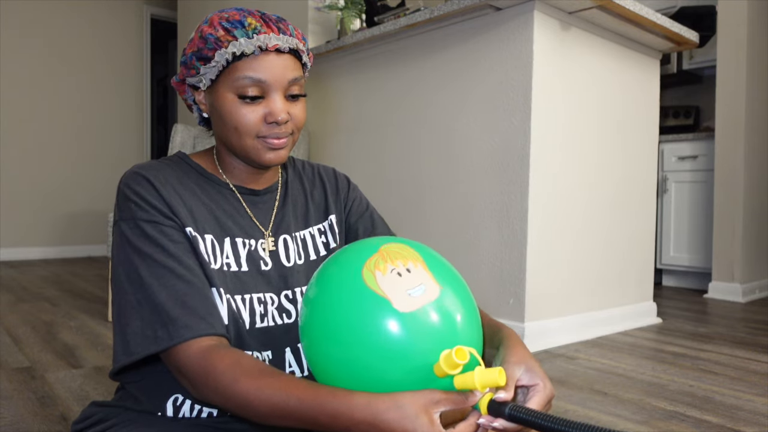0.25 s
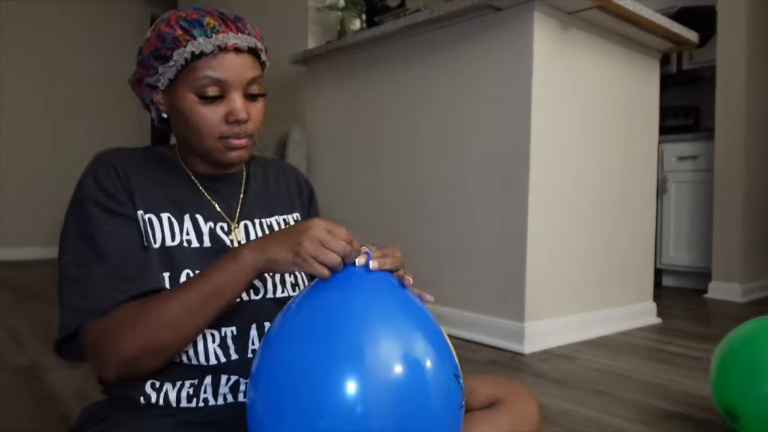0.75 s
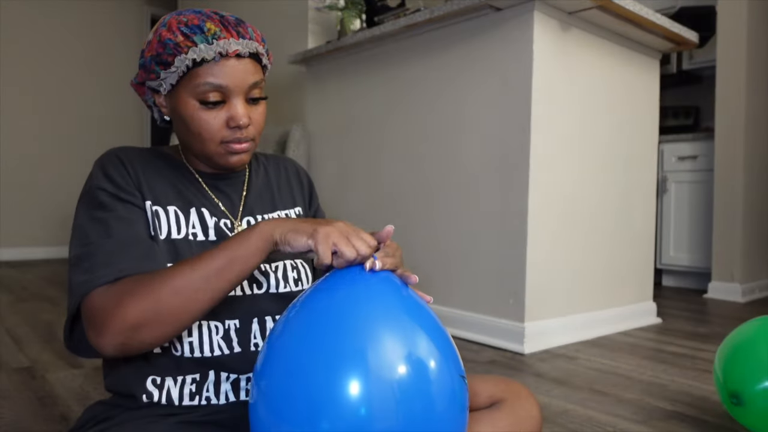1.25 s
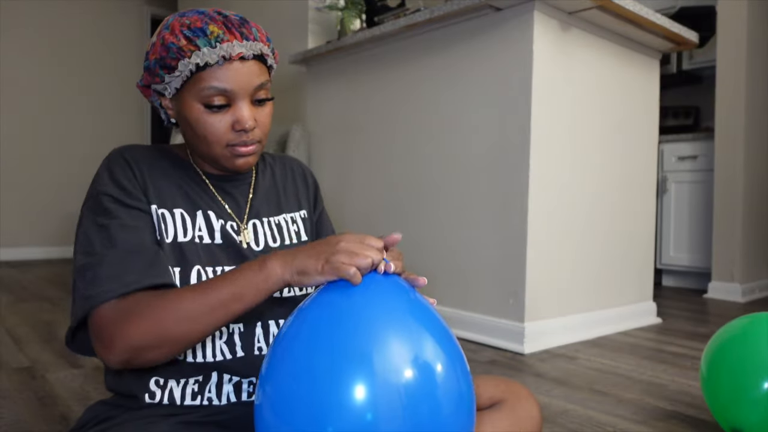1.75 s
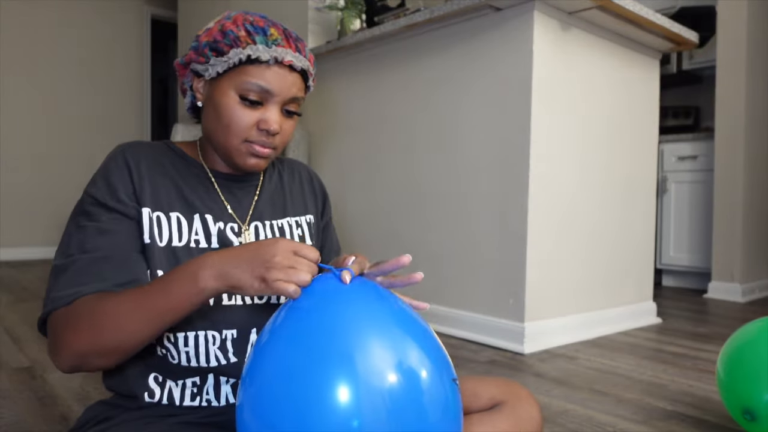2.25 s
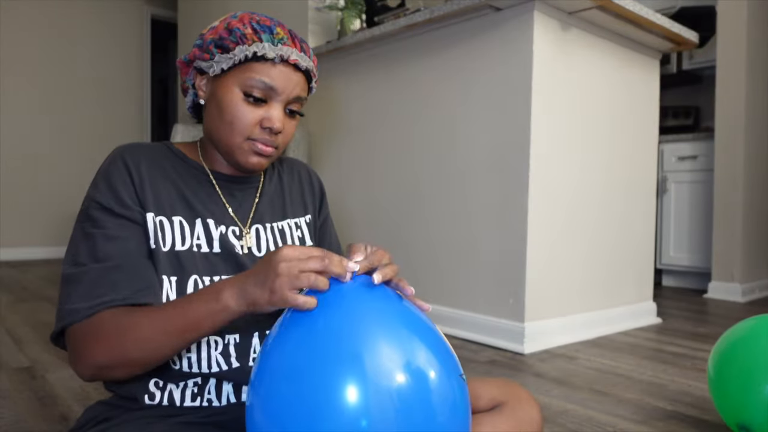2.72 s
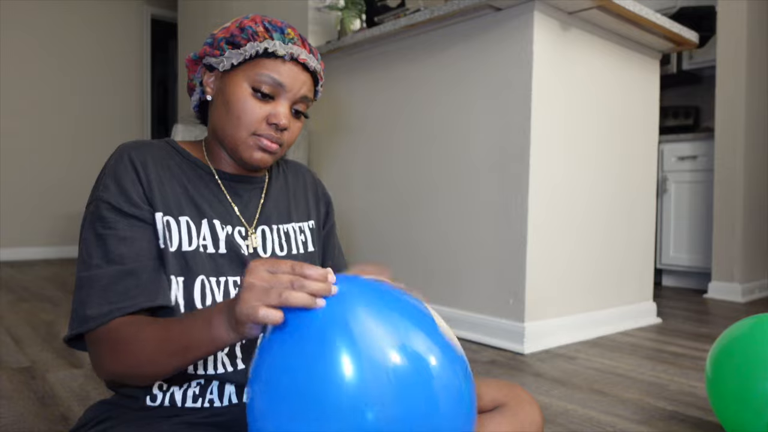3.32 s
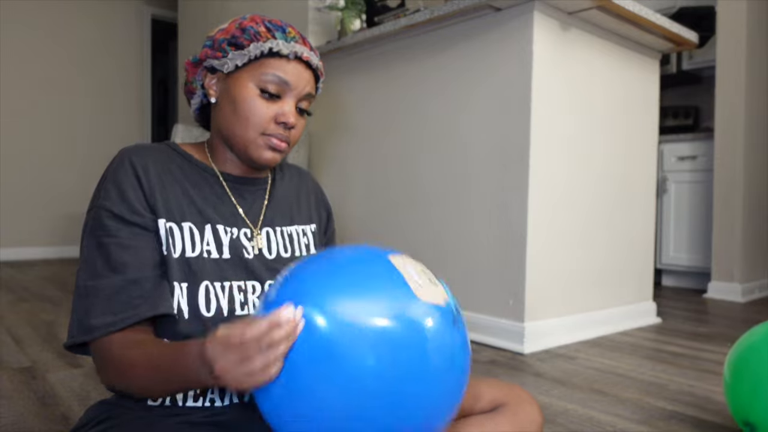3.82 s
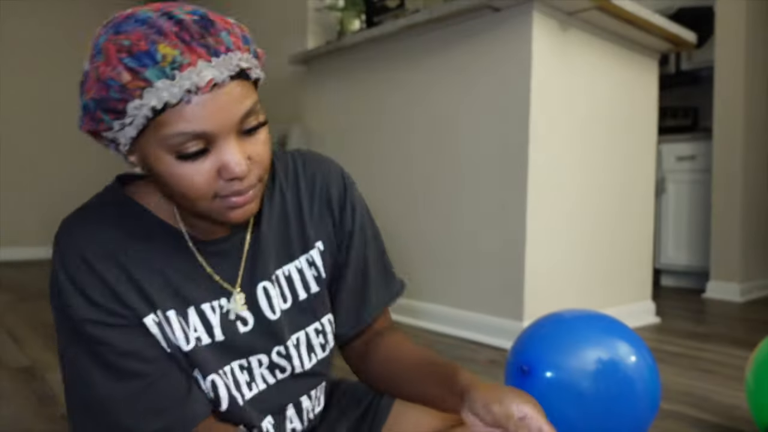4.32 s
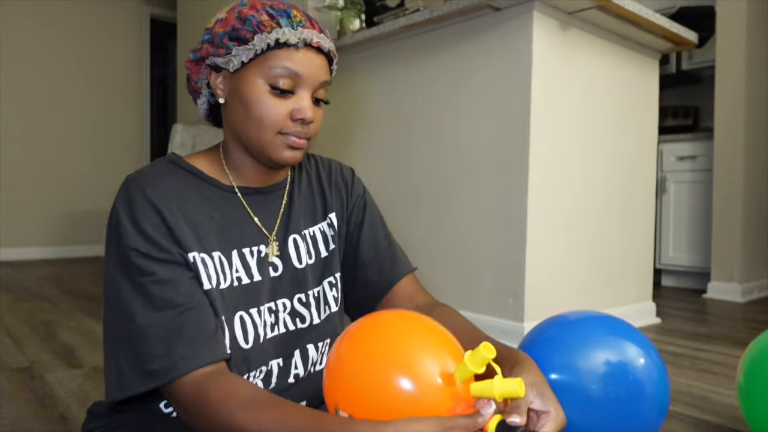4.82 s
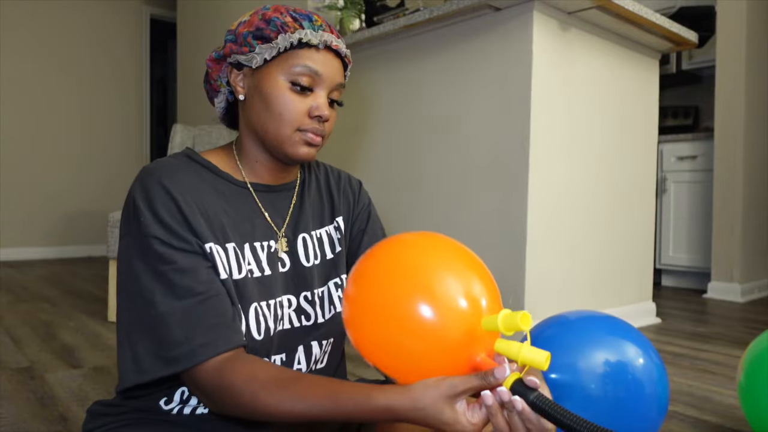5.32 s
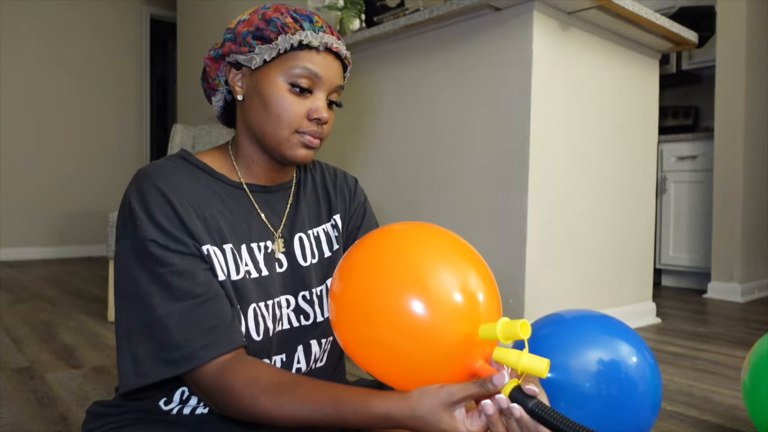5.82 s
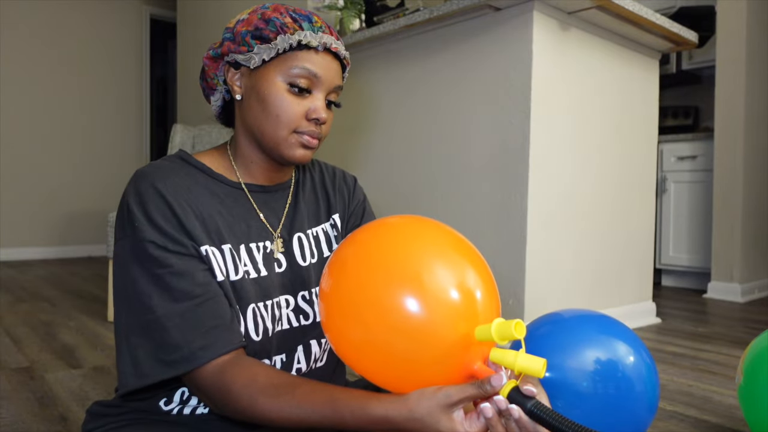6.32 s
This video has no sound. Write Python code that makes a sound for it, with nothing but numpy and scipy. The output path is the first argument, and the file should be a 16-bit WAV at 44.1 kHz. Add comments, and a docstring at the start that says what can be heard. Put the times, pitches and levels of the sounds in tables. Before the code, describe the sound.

A loud electric air pump cuts off, latex snaps and creaks softly as a balloon is knotted, then the pump blasts back higher-pitched.

```python
"""First a loud nozzle jet close by, with a blower's whine in it: an electric pump blows up a latex balloon
in a quiet living room. The jet is noise coloured by hose and nozzle; the whine is a wandering harmonic tone.
The rush stops abruptly; hands near the centre stretch and knot a balloon's neck: it ticks, creaks, snaps once,
and palms slide over the skin, all of it stick-slip noise and short bursts ringing in latex and room.
Then the pump is heard again, abruptly and at full blast, with a higher whine and a brighter jet."""
import sys
import numpy as np
from scipy import signal
from scipy.fft import rfft, irfft, next_fast_len
from scipy.io import wavfile

SR = 44100
rng = np.random.default_rng(int(sys.argv[2]) if len(sys.argv) > 2 else 0)


def file_out(sig):
    """Save sig as 16-bit WAV at sys.argv[1]."""
    # one column per channel
    cols = np.atleast_2d(sig).T
    # limit, then scale
    lim = np.clip(cols, -1, 1)
    pcm = np.round(lim * 32767).astype(np.int16)
    wavfile.write(sys.argv[1], SR, pcm)


N = 289296
TIME = np.arange(N) / SR   # seconds
BINS = np.fft.rfftfreq(N, 1 / SR)   # Hz

# The pump, heard twice. Each row: time in seconds, jet level in dB, whine level in dB.
FIRST_RUN = [(0, -14.5, -22.1), (0.43, -15, -23)]
SECOND_RUN = [(4.3, -15.5, -23.5), (4.4, -14.5, -27.5), (4.9, -15.5, -24.8), (6.56, -15, -23.5)]
FIRST_STOP_S, SECOND_START_S = 0.434, 4.292
FIRST_WHINE_HZ, SECOND_WHINE_HZ = 620.1, 1253.7
# Partials of each whine. Each row: multiple of the whine's pitch, level in dB relative to the whine level.
FIRST_PARTIALS = [(1, 1), (2, -24), (3, -22.5)]
SECOND_PARTIALS = [(1, 1), (2, -29), (3, -21), (6, -16), (7, -9), (12, -32)]
# How the second whine's overtones rise and sink as the balloon fills. Each row: time in seconds, change in dB.
OVERTONE_SWELL = [(4.3, -4), (4.65, 3.5), (5.4, 3.5), (5.9, -2), (6.56, 1)]
# Colour of the jet. Each row: frequency in Hz, relative density in dB per Hz.
FIRST_JET = [(40, -51), (100, -42), (200, -27.5), (330, -14.5), (550, -7), (1000, -4), (2200, 3),
             (4000, -1.5), (7000, -1), (8300, -4), (10000, -2), (11500, -7), (13000, -6), (15700, -12.5)]
SECOND_JET = [(40, -57), (170, -52.5), (300, -41.5), (480, -31), (750, -16), (1100, -14), (2000, -6.5),
              (4200, 1.5), (6000, -2), (8100, -5.5), (10400, -6.5), (12500, -4), (14200, -1.5), (15700, -4)]
# Resonances of hose and nozzle. Each row: frequency in Hz, width in Hz, lift in dB.
FIRST_HOSE = [(1286, 170, 4.5), (1860, 150, 7), (2695, 140, 5), (3450, 160, 4.5), (4650, 260, 4),
              (6770, 450, 3), (9150, 300, 2.5), (12300, 550, 4.5), (14400, 300, 2.5)]
SECOND_HOSE = [(2550, 53, 6.4), (3850, 270, 2.6), (5580, 120, 3.7), (6830, 290, 3.1), (8980, 760, 5.3),
               (13400, 230, 1.8)]
# Direction of the pump. Each row: frequency in Hz, left minus right in dB.
FIRST_PAN = [(700, -1.64), (2000, -3), (5500, -2.5), (8300, -3), (11000, 1.3), (13800, 4)]
SECOND_PAN = [(700, -0.85), (1300, -1.68), (2100, -2.1), (3500, -4), (5500, -3.5), (8300, -2.5),
              (10500, -4), (14000, -2)]
# Motor hum in the second run. Each row: frequency in Hz, level in dB.
MOTOR_HUM = [(128, -81), (240, -83)]

# How the room dies away. Each row: frequency in Hz, time to fall by 60 dB in seconds.
ROOM_T60 = [(300, 0.86), (3000, 0.23), (6000, 0.18), (12000, 0.62)]
# Colour of the still air. Each row: frequency in Hz, relative density in dB per Hz.
AIR_COLOUR = [(30, -36.5), (110, -26.5), (170, -7), (300, -2.5), (500, -3.5), (1000, -2), (2500, 2),
              (6000, -4), (10000, -10.5), (15700, -16)]
AIR_DB, ROOM_HUM_HZ, ROOM_HUM_DB = -79, 242, -95

# Grip of the latex, from tying the neck to sliding palms.
# Each row: time in seconds, share of the friction that comes as separate slips (0-1).
GRIP = [(0.5, .25), (0.7, .78), (1.05, 0.7), (1.3, 0.45), (2.1, 0.55), (2.85, 0.5), (3.1, 0.28),
        (3.7, 0.22), (4.25, 0.15)]
# Strokes of fingers and palms on latex.
# Each row: start in seconds, end in seconds, rasp level in dB, lower and upper edge of the rasp in Hz.
STROKES = [(0.527, 0.582, -66, 3200, 8700), (0.67, 0.714, -59.5, 3000, 5400),
           (0.76, 0.912, -66, 3000, 7200), (0.916, 1.013, -54.5, 3380, 7000),
           (1.032, 1.086, -51, 3480, 6600), (1.1, 1.172, -63, 2700, 6700),
           (1.245, 1.277, -61.5, 3400, 5700), (1.545, 1.65, -61, 3280, 6100),
           (1.653, 1.831, -68, 2600, 5900), (1.847, 1.968, -67.5, 5900, 6440),
           (2.279, 2.295, -59, 1100, 5500), (2.32, 2.38, -68, 4600, 7100),
           (2.492, 2.523, -65.5, 2100, 6600), (2.704, 2.739, -62.5, 2000, 7500),
           (2.853, 2.908, -65, 2500, 9200), (3.016, 3.087, -60.5, 2300, 7300),
           (3.106, 3.185, -58.5, 2500, 9300), (3.195, 3.299, -58.5, 2100, 5700),
           (3.33, 3.356, -70, 3000, 11000), (3.43, 3.496, -60.5, 2100, 7800),
           (3.528, 3.58, -58, 3900, 6500), (3.611, 3.742, -51.5, 3360, 7560),
           (3.745, 3.898, -62, 5330, 9000), (3.9, 3.974, -55.5, 6200, 9100),
           (4.125, 4.305, -64.5, 5600, 10500)]
# Between strokes the hands never quite leave the skin. Each row: time in seconds, rustle level in dB.
RESTING = [(0.46, -84), (0.7, -73), (1.2, -66.5), (1.4, -76), (1.55, -69.5), (2.2, -78.5), (2.45, -71.5),
           (2.65, -86), (2.78, -69), (3.05, -69.5), (4.1, -74.5)]
RESTING_LOW_HZ, RESTING_HIGH_HZ = 2900, 7800
RESTING_BODY_DB = -12.5   # the body relative to the rustle
USUAL_RASP_DB, USUAL_LOW_HZ, USUAL_BODY_DB = -60, 3000, -77.5   # an ordinary stroke
BODY_FOLLOWS = 0.59   # dB of body per dB of rasp
BODY_LOSS_DB_PER_OCT = 15   # the body's loss as the rasp's lower edge rises: a light, bright touch
BALLOON_ECHO_S = 0.00103   # time that sound takes to cross the balloon
# Colour of the balloon's body. Each row: frequency in Hz, relative density in dB per Hz.
BODY_COLOUR = [(60, -45.5), (200, -32), (450, -18.5), (700, -3), (950, 0.5), (1350, -0.5), (1900, -5.5),
               (3000, -23)]
# Resonances of the stretched neck, until the knot is made. Each row: frequency in Hz, width in Hz, lift in dB.
NECK_MODES = [(2730, 190, 3), (3800, 330, 4), (4790, 250, 1.5), (6150, 600, 3.5), (7800, 500, 3),
              (9050, 500, 4)]
# Overall colour of the neck. Each row: frequency in Hz, relative density in dB.
NECK_COLOUR = [(1500, -0.5), (4000, -1.5), (9300, -0.5), (10000, -2), (12200, 0.5), (14000, -2)]
# Resonances of the taut skin. Each row: frequency in Hz, width in Hz, lift in dB.
SKIN_MODES = [(2560, 170, 4), (3640, 120, 3.5), (4670, 210, -1), (5900, 500, 0.5), (7700, 760, 2)]
KNOT_MADE_S = 2.25

# Clear slips of the stretched neck and fingernail ticks. Each row: time in seconds, nominal direct peak in dB.
TICKS = [(0.4888, -53), (0.6914, -44), (0.7004, -44), (0.7567, -38), (0.7896, -45), (0.821, -38),
         (0.9223, -43), (1.0256, -39), (1.0442, -38), (1.463, -43), (1.5125, -45), (1.9579, -49),
         (2.0014, -45.5), (2.0592, -47), (2.0865, -45), (2.1421, -45.5), (2.1774, -47), (2.5351, -48),
         (2.8983, -42), (3.2605, -31), (3.7166, -34), (3.739, -35)]
# Colour of a tick. Each row: frequency in Hz, relative density in dB per Hz.
TICK_COLOUR = [(200, -37), (500, -22), (900, -2.5), (1600, -5.5), (2700, 0), (3800, -3.5), (5000, 3.5),
               (7500, 1.5), (10000, -4.5), (15700, -14)]
TICK_CREST_DB = 9.5   # a tick's peak stands this far above its noise level
# Faint ones come by chance while the neck is tied.
TYING_START_S, FAINT_TICKS_PER_S, FAINT_TICK_DB, FAINT_TICK_SPREAD_DB = 0.54, 10, -53.5, 1

# Squeaks of skin dragging on the balloon.
# Each row: start in seconds, length in seconds, pitch at start and at end in Hz, level in dB.
SQUEAKS = [(0.518, 0.076, 3750, 3600, -70), (0.922, 0.082, 1023, 1130, -68), (1.032, 0.034, 970, 940, -62),
           (1.245, 0.058, 1002, 933, -63.5), (1.39, 0.26, 3750, 3250, -75), (1.536, 0.14, 759, 843, -74.5),
           (1.597, 0.22, 2650, 2240, -73), (2.847, 0.079, 660, 770, -72), (3.01, 0.1, 2550, 2480, -66),
           (3.124, 0.055, 990, 740, -75), (3.189, 0.11, 900, 1255, -67.5), (3.51, 0.13, 1710, 1690, -70)]

# The neck snaps free of a finger. Each row: time in seconds, reference level in dB.
SNAP_AT = [(0.5797, -20.5)]
# Colour of the snap. Each row: frequency in Hz, relative density in dB per Hz.
SNAP_COLOUR = [(60, -68), (150, -54), (500, -29), (780, -7), (1900, -2.5), (2700, 6), (5500, 7.5),
               (7000, -2), (9300, -6), (11000, -19), (15700, -34)]
SNAP_RING_HZ, SNAP_RING_DB = 3560, -6   # dB relative to the snap's reference level

CUTOFF_HZ = 15700


def from_db(db):
    """Decibels to gain."""
    return 10 ** (np.asarray(db) / 20)


def rms_one(x):
    """Scale to unit rms."""
    return x / np.sqrt(np.mean(x ** 2) + 1e-20)


def in_time(rows):
    """Each column of a curve, sample by sample."""
    s, *columns = np.transpose(rows)
    return [np.interp(TIME, s, column) for column in columns]


def at_hz(points, hz):
    """Read a spectrum on a log-frequency axis."""
    point_hz, value = np.transpose(points)
    return np.interp(np.log(hz + 1e-3), np.log(point_hz), value)


def colour(x, spectrum, resonances=()):
    """Causal filter with a smooth spectrum and resonant lifts on it; unit gain for white noise."""
    db = at_hz(spectrum, BINS)
    for hz, width, lift_db in resonances:
        db = db + lift_db / (1 + (2 * (BINS - hz) / width) ** 2)
    # folding the cepstrum onto positive times gives minimum phase
    cepstrum = irfft(np.log(rms_one(from_db(db))), N)
    cepstrum[1:N // 2] *= 2
    cepstrum[N // 2 + 1:] = 0
    response = np.exp(rfft(cepstrum))
    return irfft(rfft(x) * response, N)


def drift(rate_hz):
    """Slow random wander with unit rms: noise that falls away above the rate."""
    spectrum = rfft(rng.standard_normal(N)) / (1 + (BINS / rate_hz) ** 2)
    return rms_one(irfft(spectrum, N))


def pan(x, lean_db):
    """Place a sound between left (positive) and right, by one figure or one per frequency."""
    return np.array([irfft(rfft(x) * from_db(side * lean_db / 2), N) for side in (1, -1)])


def room(x, wet_db):
    """Direct sound plus a diffuse tail that builds up over 11 ms and decays at a rate set by frequency."""
    t, tail = TIME[:SR // 2], 0
    edges_hz = np.geomspace(100, 17000, 9)
    for low, high in zip(edges_hz, edges_hz[1:]):
        bandpass = signal.butter(2, [low, high], "band", fs=SR, output="sos")
        band = signal.sosfilt(bandpass, rng.standard_normal(len(t)))
        tail = tail + band * 1000 ** (-t / at_hz(ROOM_T60, np.sqrt(low * high)))
    tail = tail * np.clip(t / 0.011, 0, 1)
    tail = tail / np.linalg.norm(tail)
    return x + from_db(wet_db) * signal.fftconvolve(x, tail)[:N]


def jet(spectrum, hose, flutter_db, wet_db):
    """Turbulence at the nozzle, fluttering in strength and coloured by the hose and the room."""
    turbulence = rng.standard_normal(N) * from_db(flutter_db * drift(60))
    return rms_one(colour(room(turbulence, wet_db), spectrum, hose))


def whine(hz, partials, wander_hz, shimmer_db, swell_db=0):
    """The blower's nearly steady tone; the airflow makes its overtones swell and sink a little."""
    phase = 2 * np.pi * np.cumsum(hz + wander_hz * drift(13)) / SR
    tone = 0
    for multiple, db in partials:
        k = round(multiple)
        tremble_db = shimmer_db * np.log2(k) * drift(5.5) + swell_db * (k > 1)
        tone = tone + from_db(db + tremble_db) * np.sin(k * phase + rng.uniform(0, 2 * np.pi))
    return np.sqrt(2) * tone


def first_run():
    """The pump fills a balloon with a low whine; then the rush and whine break off abruptly, fading out within
    12 ms."""
    jet_db, whine_db = in_time(FIRST_RUN)
    air = from_db(jet_db) * jet(FIRST_JET, FIRST_HOSE, flutter_db=0.1, wet_db=-8)
    tone = from_db(whine_db) * whine(FIRST_WHINE_HZ, FIRST_PARTIALS, wander_hz=0.35, shimmer_db=1.24)
    left_s = FIRST_STOP_S - TIME
    fade_out = np.clip(left_s / 0.012, 0, 1)
    # the faint end of the rush, around the stop
    faint_end = from_db(-25.5) * np.clip(1 - np.abs(left_s) / 0.011, 0, 1)
    return pan(air + tone, at_hz(FIRST_PAN, BINS)) * (fade_out + faint_end)


def still_air():
    """Faint room hiss and the wavering hum of a distant appliance."""
    hum = from_db(ROOM_HUM_DB) * np.sin(2 * np.pi * ROOM_HUM_HZ * TIME) * (1 + 0.4 * drift(8))
    hiss = from_db(AIR_DB) * colour(rng.standard_normal(N), AIR_COLOUR)
    return hiss + hum


def slips(per_s, spread_db, length_s):
    """Latex sticks and lets go at uneven intervals; each slip is a decaying pulse of its own size."""
    interval, size = rng.standard_normal((2000, 2)).T
    at = (np.cumsum(np.exp(0.5 * interval) / per_s) * SR).astype(int)
    inside = at < N
    starts = np.zeros(N)
    starts[at[inside]] = from_db(spread_db * np.tanh(size[inside]))
    return rms_one(signal.lfilter([1], [1, -np.exp(-1 / (length_s * SR))], starts + 1e-18))


def contact(x, low_hz, high_hz, echo, spot_lift_db, spot_width_hz):
    """Colour of one touch: a band set by the contact, an echo across the balloon, a few modes of that spot."""
    x = signal.lfilter(*signal.butter(3, low_hz, "high", fs=SR), x)
    hz = np.fft.rfftfreq(len(x), 1 / SR)
    x = irfft(rfft(x) / np.sqrt(1 + (hz / high_hz) ** 6), len(x))
    lag = round(BALLOON_ECHO_S * SR) + rng.integers(-1, 2)
    x = x + echo * np.pad(x, (lag, 0))[:len(x)]
    modes_hz = np.geomspace(2600, 9000, 6) * rng.uniform(0.9, 1.1, size=6)
    for mode_hz in modes_hz:
        mode = signal.lfilter(*signal.iirpeak(mode_hz, mode_hz / spot_width_hz, fs=SR), x)
        x = x + (from_db(spot_lift_db) - 1) * mode
    return rms_one(x)


def rubbing(attack_s, release_s, swell):
    """Smooth friction, broken into slips by the grip, rasps on the skin and sounds in the balloon's body."""
    slipping = slips(per_s=170, spread_db=5, length_s=0.0025)
    grips = np.clip(in_time(GRIP)[0], 0, 0.9)
    friction = np.sqrt(1 - grips + grips * slipping ** 2)
    skin_noise, body_noise = friction * rng.standard_normal((2, N))
    resting = from_db(in_time(RESTING)[0])
    skin = resting * contact(skin_noise, RESTING_LOW_HZ, RESTING_HIGH_HZ,
                             echo=0.2, spot_lift_db=3.5, spot_width_hz=200)
    body = resting * from_db(RESTING_BODY_DB) * body_noise
    for start_s, end_s, rasp_db, low_hz, high_hz in STROKES:
        # leave time for the onset before the stroke and its release after it
        first = round((start_s - 0.04) * SR)
        span = slice(first, first + next_fast_len(round((end_s - start_s + 0.14) * SR)))
        t, grip = TIME[span], grips[span].mean()
        bright_oct = np.log2(low_hz / USUAL_LOW_HZ)
        body_db = USUAL_BODY_DB + BODY_FOLLOWS * (rasp_db - USUAL_RASP_DB)
        body_db -= BODY_LOSS_DB_PER_OCT * max(bright_oct, -0.25)
        along = np.clip((t - start_s) / (end_s - start_s), 0, 1)
        arch = 1 + swell * (np.sin(np.pi * along) - 2 / np.pi)
        # a gripping finger starts and stops with a jerk, a gliding one eases in and out
        rise = 0.5 + 0.5 * np.tanh((t - start_s) / (attack_s * (1 - grip)))
        fall = np.exp(-np.maximum(t - end_s, 0) / (release_s * (1 - grip)))
        pressure = arch * rise * fall
        rasp = contact(skin_noise[span], low_hz, high_hz, echo=0.4 * grip, spot_lift_db=6, spot_width_hz=200)
        skin[span] += from_db(rasp_db) * pressure * rasp
        body[span] += from_db(body_db) * pressure * body_noise[span]
    flat = [(1000, 0), (10000, 0)]
    tying = TIME < KNOT_MADE_S
    neck_sound = colour(skin * tying, NECK_COLOUR, NECK_MODES)
    skin_sound = colour(skin * ~tying, flat, SKIN_MODES)
    return room(neck_sound + skin_sound + colour(body, BODY_COLOUR), wet_db=-8.5)


def bursts(events, length_s):
    """Envelope of sudden releases that hold for a moment and collapse."""
    out = np.zeros(N)
    shape = np.exp(-(TIME[:SR // 50] / length_s) ** 2)
    for s, db in events:
        at = round(s * SR)
        out[at:at + len(shape)] += from_db(db) * shape
    return out


def ticks():
    """Single slips of the neck and touches of the nails, with a scatter of faint ones during the tying."""
    wait, size = rng.standard_normal(size=(60, 2)).T
    times = TYING_START_S + np.cumsum(np.exp(0.5 * wait)) / FAINT_TICKS_PER_S
    levels_db = FAINT_TICK_DB + FAINT_TICK_SPREAD_DB * size
    faint = [(s, db) for s, db in zip(times, levels_db) if s < KNOT_MADE_S]
    touch = bursts(list(TICKS) + faint, length_s=0.0022) * rng.standard_normal(N)
    return room(from_db(-TICK_CREST_DB) * colour(touch, TICK_COLOUR, SKIN_MODES), wet_db=-5)


def squeaks(width_hz):
    """Friction excites one broad mode of the skin, which glides as the finger changes its tension."""
    out = np.zeros(N)
    drive = (drift(width_hz) + 1j * drift(width_hz)) / np.sqrt(2)
    for s, length_s, start_hz, end_hz, db in SQUEAKS:
        along = np.clip((TIME - s) / length_s, 0, 1)
        phase = 2 * np.pi * np.cumsum(start_hz + (end_hz - start_hz) * along) / SR
        arch = np.sqrt(np.abs(np.sin(np.pi * along)))
        out += from_db(db) * arch * np.real(drive * np.exp(1j * phase))
    return room(np.sqrt(2) * out, wet_db=-15)


def snap():
    """The taut neck whips back with a crack that fills the room, and rings for a few milliseconds."""
    release = bursts(SNAP_AT, length_s=0.0047)
    click = np.maximum(np.diff(release, prepend=0), 0)   # only the sudden onset
    crack = from_db(7) * colour(click, SNAP_COLOUR)
    slap = from_db(-10) * colour(release * rng.standard_normal(N), SNAP_COLOUR)
    ring = from_db(SNAP_RING_DB) * release * np.sin(2 * np.pi * SNAP_RING_HZ * TIME)
    ring = signal.lfilter(*signal.butter(2, SNAP_RING_HZ / 2, "high", fs=SR), ring)
    echoes = room(crack, wet_db=4) - crack
    return from_db(-2) * crack + echoes + room(slap + ring, wet_db=-4)


def second_run():
    """The pump again, abruptly and at full blast: a whine about an octave higher, a faint unsteady motor hum."""
    jet_db, whine_db = in_time(SECOND_RUN)
    air = from_db(jet_db) * jet(SECOND_JET, SECOND_HOSE, flutter_db=0.5, wet_db=-11)
    tone = from_db(whine_db) * whine(SECOND_WHINE_HZ, SECOND_PARTIALS, wander_hz=0.417, shimmer_db=0.2,
                                     swell_db=in_time(OVERTONE_SWELL)[0])
    hum = sum(from_db(db) * np.sin(2 * np.pi * hz * TIME) * drift(7) for hz, db in MOTOR_HUM)
    fade_in = np.clip((TIME - SECOND_START_S) / 0.0096, 0, 1)
    return pan(air + tone + hum, at_hz(SECOND_PAN, BINS)) * fade_in


def scene():
    """The pump mostly a little to the right, the hands and the still air almost in the middle."""
    hands = rubbing(attack_s=0.015, release_s=0.017, swell=0.33) + squeaks(width_hz=110) + ticks() + snap()
    near = pan(hands + still_air(), lean_db=-0.3)
    return first_run() + second_run() + near


def record(dry):
    """At the microphones the top is cut steeply, by an elliptic low-pass."""
    return signal.sosfilt(signal.ellip(14, 0.05, 90, CUTOFF_HZ, fs=SR, output="sos"), dry)


dry = scene()
out = record(dry)
file_out(out)
```